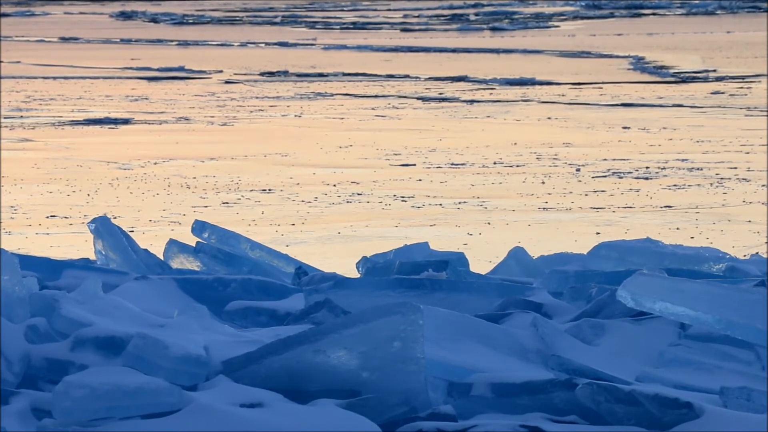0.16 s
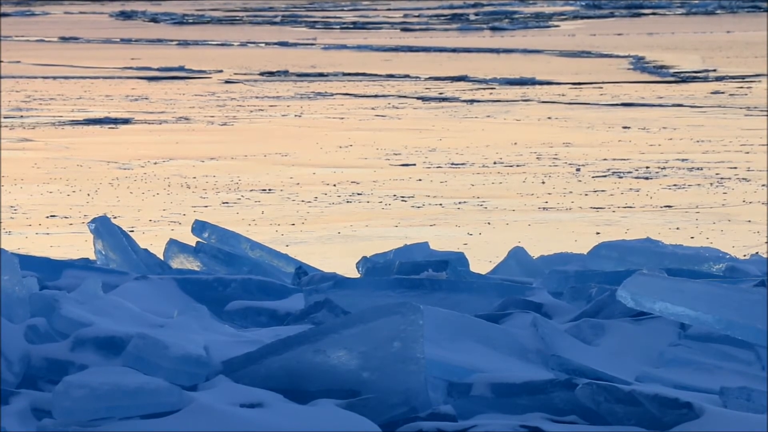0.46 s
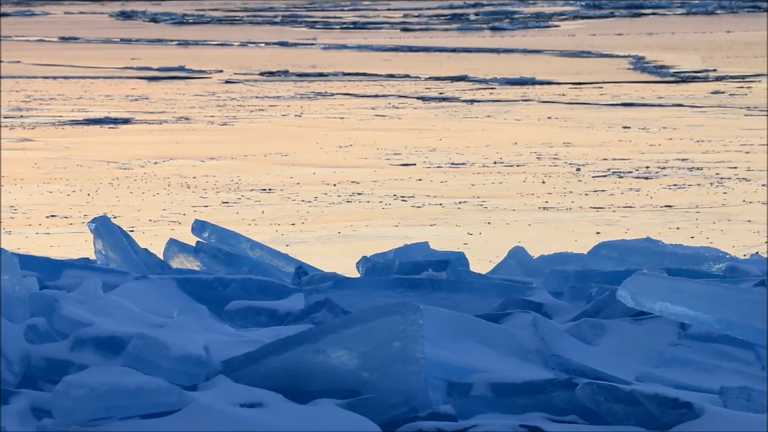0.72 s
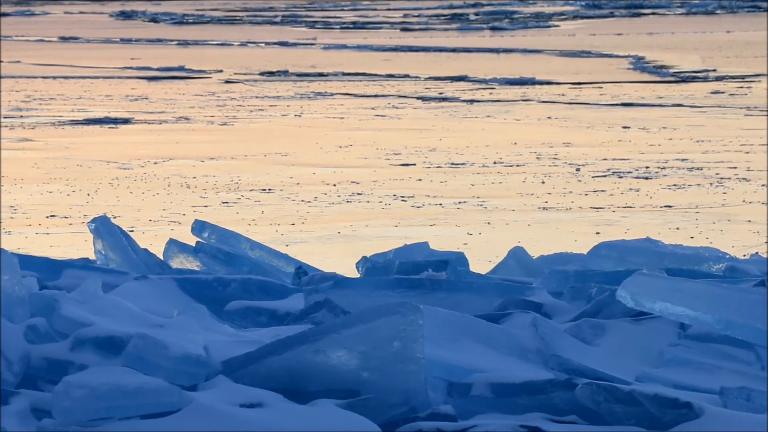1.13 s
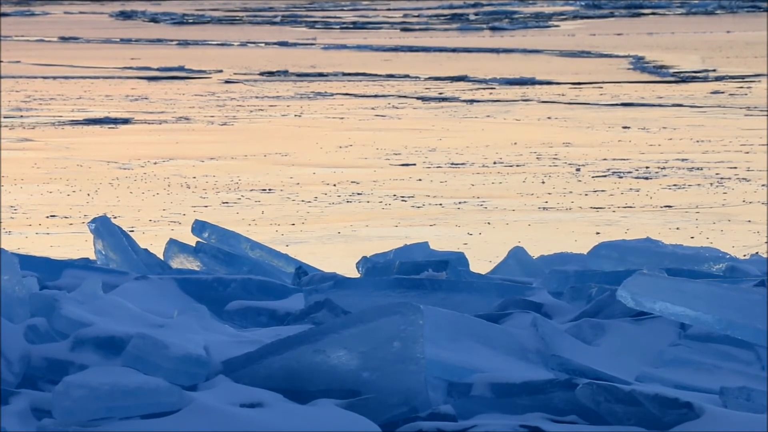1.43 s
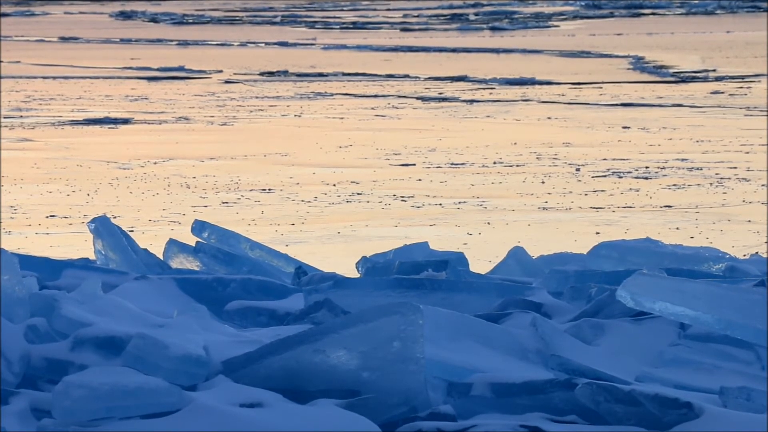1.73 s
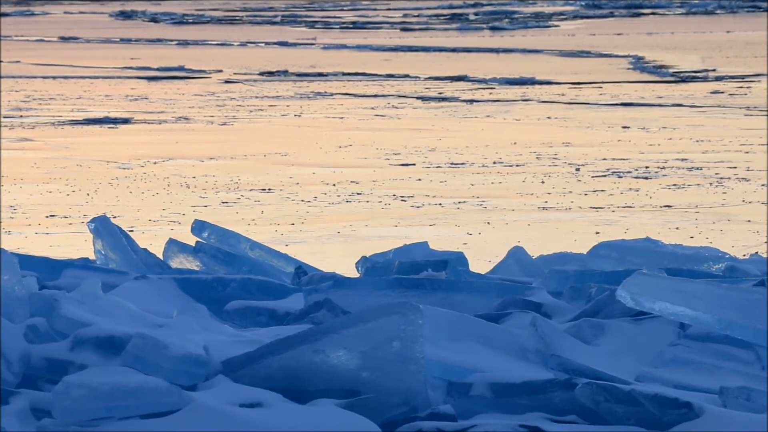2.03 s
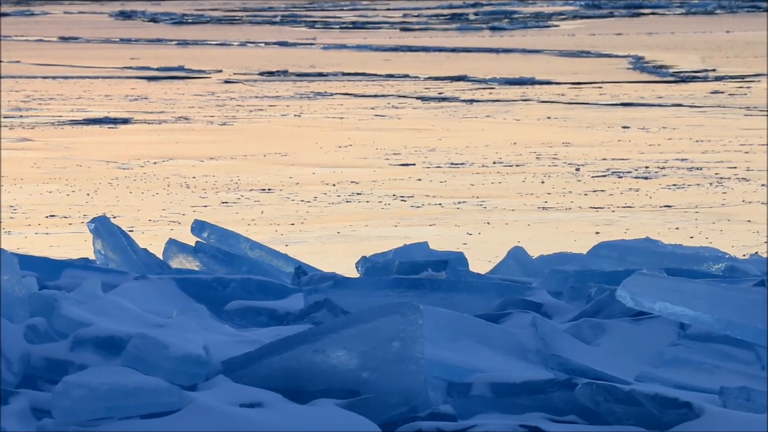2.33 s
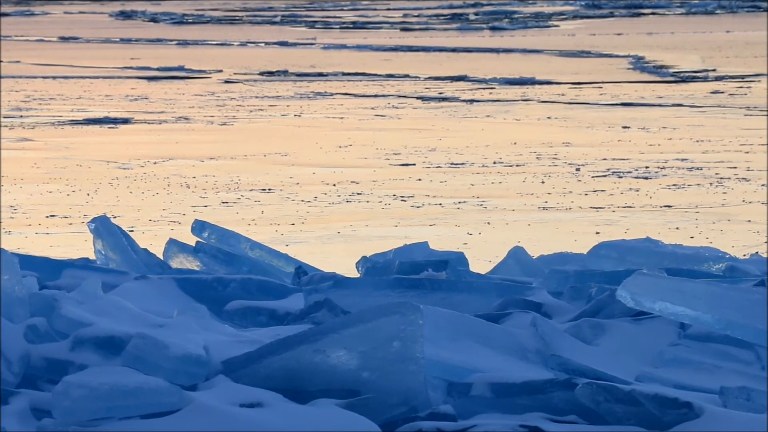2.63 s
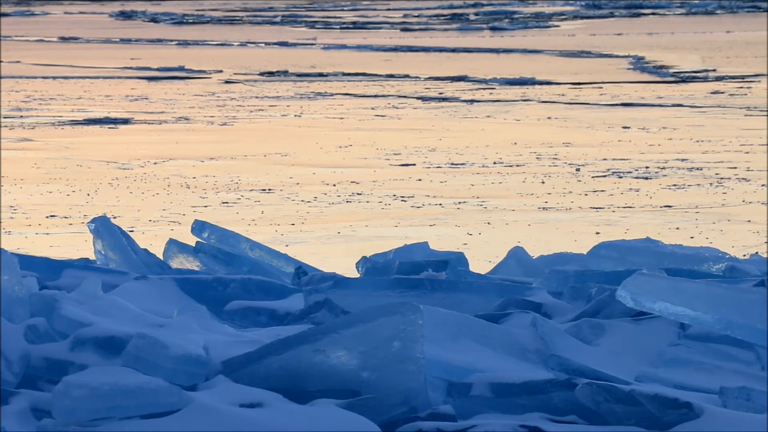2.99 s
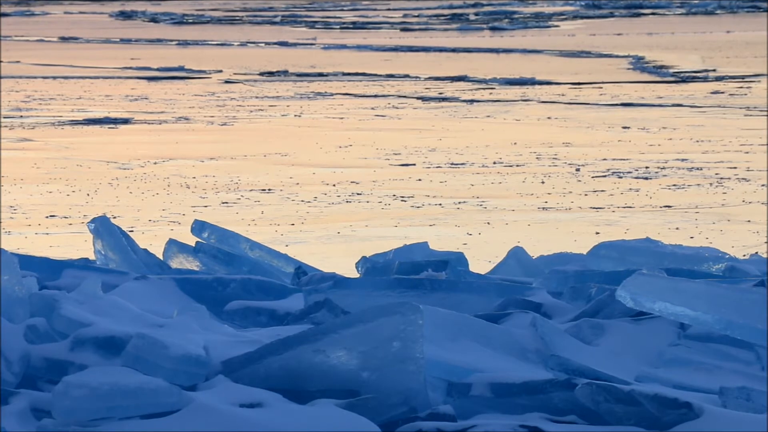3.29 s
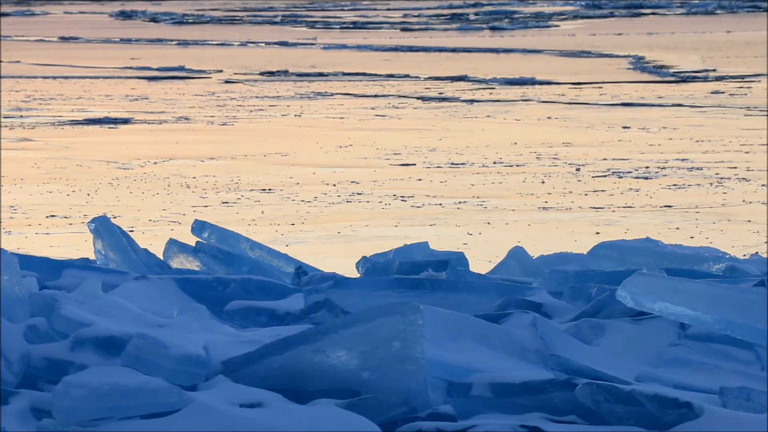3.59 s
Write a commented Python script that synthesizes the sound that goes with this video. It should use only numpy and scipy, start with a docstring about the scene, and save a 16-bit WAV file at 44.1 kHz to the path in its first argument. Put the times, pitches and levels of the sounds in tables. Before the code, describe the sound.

Ice grinds steadily on an open frozen shore: a muffled wash of tiny bumps and a wavering mid-low groan. Hollow knocks and dry ticks crowd the first 1.2 seconds, return around 1.5-1.6, and cluster again at 2.7-2.9 with a faint airy scrape; afterwards the ice calms. Deep wind buffets the microphone throughout, strongest about 1.6-2.3, leaning left, with soft thumps near 0.7 and 3.0 and faint hiss.

```python
"""Grinding ice on a windy, frozen shore

Wind buffets a camera microphone while ice sheets grind and drift offshore.
Shaped noise makes the deep buffeting, the upper rumble, the wash of grinding ice and the recorder's hiss.
The ice groans in a wavering band of noise, with longer fuzzy rings and airy scrapes now and then.
Fading sine tones make the small bumps, soft thumps and hollow knocks; ticks add a snap of noise.
"""
import sys
import numpy as np
from scipy import signal
from scipy.fft import rfft, irfft
from scipy.io import wavfile
from scipy.ndimage import uniform_filter1d

SR = 44100
rng = np.random.default_rng(int(sys.argv[2]) if len(sys.argv) > 2 else 0)


def dump_mix(stems):
    """Bounce the given channels to the path in sys.argv[1] as a 16-bit WAV at rate SR."""
    frames = np.atleast_2d(stems).T  # one column per channel
    limited = np.clip(frames, -1, 1)  # hard clip at full scale
    pcm = np.round(limited * 32767).astype(np.int16)
    wavfile.write(sys.argv[1], SR, pcm)


N = 165375  # length in samples, 3.75 s


def gain_of(db):
    """Turns decibels into a factor for the amplitude."""
    return 10 ** (np.asarray(db) / 20)


def evened(x):
    """Scales a sound to an rms level of 1."""
    return x / np.sqrt(np.mean(x ** 2) + 1e-20)


def read(points, hz):
    """Reads a frequency table at any frequency, along a logarithmic scale."""
    f, value = np.transpose(points)
    return np.interp(np.log(hz + 1), np.log(f + 1), value)


def curve(table, axis):
    """Draws one column of a table as a line over time."""
    rows = np.array(table)
    return np.interp(np.arange(N) / SR, rows[:, 0], rows[:, axis])


def panned(x, db):
    """Makes the left channel louder than the right by db, half up and half down."""
    return x * gain_of(np.array([[db], [-db]]) / 2)


SIDE_LAG_S = 0.00013  # near sounds from the left reach the right port later


def from_left(x, db):
    """Makes a sound louder and earlier at the left port."""
    t = np.arange(len(x)) / SR
    late = np.interp(t - SIDE_LAG_S, t, x)
    return panned(np.array([x, late]), db)


def add(mix, s, sound):
    """Adds a sound to the mix at s seconds, cut off at the end of the mix."""
    part = mix[:, round(s * SR):][:, :sound.shape[1]]
    part += sound[:, :part.shape[1]]


def resonate(x, hz, width):
    """Shifts hz down to zero, smooths, and shifts back: a resonance of gain 1, width in Hz."""
    phase = 2 * np.pi * np.cumsum(hz * np.ones(x.shape[-1])) / SR
    turn = np.exp(1j * phase)
    r = np.exp(-np.pi * width / SR)
    smooth = signal.lfilter([1 - r], [1, -r], x / turn)
    return 2 * (turn * smooth).real


def pair(same, colour):
    """Makes two channels of coloured noise, alike to a degree that depends on frequency."""
    hz = np.fft.rfftfreq(N, 1 / SR)
    a, b = rfft(rng.standard_normal((2, N)))
    c = np.clip(read(same, hz), -1, 1)
    right = c * a + np.sqrt(1 - c ** 2) * b
    return evened(irfft(np.array([a, right]) * gain_of(read(colour, hz)), N))


def wobble(rate):
    """Makes slow random movement of rms 1, mostly below rate times per second."""
    hz = np.fft.rfftfreq(N, 1 / SR)
    z = rfft(rng.standard_normal(N)) / (1 + (hz / rate) ** 4)
    return evened(irfft(z, N))


STEADY = 0.79  # how far random fading is evened out, 0 to 1


def steadied(x, seconds):
    """Evens out random fading using each channel's power plus half the other's, smoothed twice."""
    size = int(seconds * SR)
    power = x ** 2 + x[::-1] ** 2 / 2
    power = uniform_filter1d(uniform_filter1d(power, size), size)
    return evened(x / (power + .02 * power.mean()) ** (STEADY / 2))


# Tone colour of the hiss. Each row: frequency in Hz, relative strength in dB per Hz.
HISS_COLOUR = [(500, 0.5), (3000, -1), (8000, -2), (15500, -3)]
HISS_DB = -57


def hiss():
    """The recorder's own hiss: noise that is unrelated in the two channels."""
    unrelated = [(1, 0), (2, 0)]  # Hz, likeness
    return gain_of(HISS_DB) * pair(unrelated, HISS_COLOUR)


# Gusts of wind. Each row: time in seconds, deep buffeting level in dB, upper rumble level in dB,
# both levels before panning.
GUSTS = [(0.0, -30, -41), (0.04, -41, -57), (0.06, -49, -60), (0.13, -28.5, -43.5), (0.24, -40, -41.5),
         (0.44, -43, -50), (0.48, -28.5, -46), (0.62, -46, -52), (0.69, -31.5, -34), (0.74, -36, -46),
         (0.77, -41.5, -46), (0.89, -32.5, -46.5), (1.07, -42.5, -52), (1.1, -35.5, -47.5),
         (1.32, -38, -45), (1.35, -36.5, -44.5), (1.49, -31.5, -43), (1.53, -32, -43), (1.58, -22, -39.5),
         (1.79, -40.5, -44), (1.83, -23, -42.5), (1.86, -22.5, -39), (2.19, -35, -42), (2.27, -22.5, -50),
         (2.3, -29.5, -37.5), (2.62, -41.5, -48), (2.76, -29.5, -48), (2.83, -41.5, -61),
         (3.06, -29.5, -39.5), (3.18, -45, -63), (3.22, -36, -47), (3.46, -36, -47.5), (3.48, -39, -56.5),
         (3.75, -40, -41)]
# Tone colour of the deep buffeting. Each row: frequency in Hz, relative strength in dB per Hz.
BUFFET_COLOUR = [(5, -56), (8, 7), (21, 7), (33, 5.5), (57, -2), (90, -17.5), (150, -48), (400, -100)]
# Tone colour of the upper rumble. Each row: frequency in Hz, relative strength in dB per Hz.
RUMBLE_COLOUR = [(30, -21), (60, -2.5), (92, -1.5), (140, -8.5), (209, -14), (300, -20), (500, -25.5),
                 (1000, -55), (3000, -100)]
# How alike the wind is left and right. Each row: frequency in Hz, likeness from -1 to 1.
WIND_LIKENESS = [(15, 0.81), (45, 0.68), (70, 0.31), (100, 0.034), (160, -0.37), (270, 0.021)]
WIND_PAN_DB, RUMBLE_PAN_DB = 5.5, 2  # left over right
LUMPS_DB = 3  # rms swing of the rumble's level


def wind():
    """Wind noise: deep buffeting and a lumpier upper rumble, stronger on the left port."""
    deep = steadied(pair(WIND_LIKENESS, BUFFET_COLOUR), 0.047)
    deep = deep * gain_of(curve(GUSTS, axis=1))
    # the left channel swings more slowly than the right
    lumps = gain_of(LUMPS_DB * np.array([wobble(15), wobble(28)]))
    upper = evened(pair(WIND_LIKENESS, RUMBLE_COLOUR) * lumps)
    upper = upper * gain_of(curve(GUSTS, axis=2))
    return panned(deep, WIND_PAN_DB) + panned(upper, RUMBLE_PAN_DB)


# Soft thumps at the microphone. Each row: start in seconds, approximate peak in dB before panning,
# pitch in Hz, left over right in dB.
THUMPS = [(0.672, -32.5, 103, 10), (3.025, -31, 149, 7.5)]
THUMP_T60 = 0.058  # seconds to fade by 60 dB


def thump(peak_db, hz, pan_db):
    """A dull, fading low tone that reaches the two ports partly out of step."""
    t = np.arange(6000) / SR
    lag = np.array([[0], [1.5]])  # radians, left and right
    push = np.sin(2 * np.pi * hz * t - lag) * np.minimum(t / 0.0036, 1)
    # the extra 5 dB offsets fading during the soft start
    return panned(push * gain_of(peak_db + 5 - 60 * t / THUMP_T60), pan_db)


# Strength of the grinding ice, used by wash and bumps. Each row: time in seconds,
# base level in dB before each layer's own offset and panning.
GRIND = [(0.02, -46), (0.36, -50), (0.78, -45), (1.2, -51), (1.6, -48), (2.03, -50), (2.7, -48.5),
         (2.86, -45), (3.16, -49.5), (3.75, -49)]
# Tone colour of the ice noise, for wash and moan. Each row: frequency in Hz, relative strength in dB per Hz.
ICE_COLOUR = [(150, 3), (280, -6), (450, 0), (700, -3), (1050, -8.5), (1540, -12), (2180, -19),
              (4200, -26.5), (9000, -37)]
# How alike the ice noise is left and right, for wash and moan. Each row: frequency in Hz, likeness.
ICE_LIKENESS = [(270, 0.77), (500, 0.92), (1200, 0.67), (2000, 0.43), (4000, 0.41)]
WASH_DB = -0.5  # offset from the base level
WASH_SHARE = 0.94  # how closely the wash follows the changes in level, 0 to 1
GRIND_PAN_DB = 2.5  # left over right, for wash, bumps, moan and rings


def wash():
    """Grinding ice as a broad noise whose level follows the grinding and wobbles at random."""
    level_db = curve(GRIND, axis=1)
    mean_db = level_db.mean()
    wash_db = WASH_DB + mean_db + WASH_SHARE * (level_db - mean_db) + wobble(16)
    return panned(pair(ICE_LIKENESS, ICE_COLOUR) * gain_of(wash_db), GRIND_PAN_DB)


BUMPS_PER_S, BUMPS_DB = 75, -9  # average rate, offset from the base level
BUMP_SPREAD_DB = 3  # scale of the random spread in size


def bumps():
    """Many small random bumps of the ice, each a tone that fades by 60 dB in 25 cycles."""
    spread_db = BUMP_SPREAD_DB * np.minimum(rng.exponential(1, N), 3)
    size = gain_of(spread_db) * (rng.random(N) < BUMPS_PER_S / SR)
    kind = rng.integers(0, 12, N)  # which of twelve pitches
    t = np.arange(3000) / SR
    total = np.zeros(N)
    for k, hz in enumerate(np.geomspace(330, 1000, 12)):
        tone = np.sin(2 * np.pi * hz * t) * gain_of(-60 * t * hz / 25)
        total += signal.oaconvolve(size * (kind == k), tone)[:N]
    return panned(evened(total) * gain_of(curve(GRIND, axis=1) + BUMPS_DB), GRIND_PAN_DB)


# Wavering moan of the ice. Each row: time in seconds, base level in dB before the offset and panning,
# centre in Hz.
MOAN = [(0.02, -39.5, 602), (0.08, -52, 570), (0.12, -49.5, 617), (0.44, -43.5, 618), (0.48, -50, 584),
        (0.58, -39.5, 602), (0.74, -50, 530), (0.76, -46, 510), (0.93, -44.5, 658), (1.08, -46, 563),
        (1.12, -64, 587), (1.16, -41, 652), (1.25, -52.5, 526), (1.45, -49, 556), (1.48, -55, 564),
        (1.56, -40.5, 522), (1.59, -61, 601), (1.62, -48, 652), (1.66, -47, 627), (1.7, -47, 546),
        (1.75, -58, 557), (1.88, -49.5, 571), (2.22, -54, 570), (2.32, -49, 513), (2.35, -54, 521),
        (2.38, -49, 626), (2.45, -52, 550), (2.53, -56, 570), (2.7, -50.5, 577), (2.72, -46, 600),
        (2.76, -48, 610), (2.82, -40.5, 540), (2.87, -57, 507), (2.92, -52, 581), (3.03, -56, 528),
        (3.1, -51, 577), (3.14, -62, 551), (3.22, -54, 535), (3.3, -53, 517), (3.75, -56, 536)]
GROAN_WIDTH_HZ, GROAN_DB = 100, -4  # width of each of two resonances, offset from the base level


def moan():
    """The groan of the ice: noise through two resonances that drift in pitch together."""
    hz = curve(MOAN, axis=2)
    noise = pair(ICE_LIKENESS, ICE_COLOUR)
    for _ in range(2):
        noise = resonate(noise, hz, GROAN_WIDTH_HZ)
    level = gain_of(curve(MOAN, axis=1) + GROAN_DB)
    return panned(steadied(noise, .012) * level, GRIND_PAN_DB)


# Slower, longer rings of the sheet. Each row: start in seconds, length in seconds,
# base level in dB before the offset, swell and panning, centre in Hz.
RINGS = [(1.555, 0.064, -46, 742), (1.63, 0.043, -48.5, 720), (2.36, 0.062, -47, 720),
         (2.89, 0.05, -49, 434), (2.91, 0.06, -46.5, 737), (3.17, 0.11, -48.5, 527)]
RING_WIDTH_HZ = 79  # width of each of two resonances


def ring(length, level_db, hz):
    """A fuzzy note of narrow noise that swells and fades."""
    t = np.arange(0, length, 1 / SR)
    note = rng.standard_normal(len(t) + 2000)
    for _ in range(2):
        note = resonate(note, hz, RING_WIDTH_HZ)
    note = evened(note[2000:])  # skip the resonances' build-up
    swell = np.sin(np.pi * t / length)
    return panned(note * swell * gain_of(level_db - 1.5), GRIND_PAN_DB)


# Scrapes. Each row: start in seconds, length in seconds, level in dB before the soft ends and panning,
# centre in Hz.
SCRAPES = [(.755, 0.071, -55, 1610), (2.29, 0.067, -56, 1510), (2.85, 0.231, -58.5, 1690)]
SCRAPE_WIDTH_HZ, SCRAPE_PAN_DB = 600, 6.5  # width of each of two resonances, left over right


def scrape(length, level_db, hz):
    """Airy rubbing: noise in a narrow band, off to the left, with soft ends."""
    t = np.arange(0, length, 1 / SR)
    rub = rng.standard_normal(len(t))
    for _ in range(2):
        rub = resonate(rub, hz, SCRAPE_WIDTH_HZ)
    rise = t / length / .4  # over the first 40 percent
    fall = (length - t) / .02  # over the last 20 ms
    ends = np.clip(np.minimum(rise, fall), 0, 1)
    return from_left(evened(rub) * ends * gain_of(level_db), SCRAPE_PAN_DB)


# Ticks of cracking ice. Each row: start in seconds, level in dB of the lower ring before fading and panning,
# lower ring in Hz, upper ring in Hz, upper ring in dB against the lower, snap in dB against that level,
# left over right in dB.
TICKS = [(.3072, -41.5, 1440, 2530, -4, -10, 14), (.393, -44, 1730, 2780, 3, -3, 13),
         (.433, -46, 1400, 3670, -2, -13, 11), (.508, -44, 1550, 3000, -1, -18, 14),
         (.5755, -39, 1400, 3070, -1.5, -16, 14.5), (.6614, -42.5, 1500, 3280, -2.5, -15, 15),
         (.8064, -44, 1300, 2800, 2, -15, 11), (.8365, -37.5, 1440, 2730, -6, -18, 16),
         (1.085, -46, 1210, 2500, -15, -22, 10), (1.538, -41, 1410, 2720, -17, -19, 2.5),
         (1.942, -40.5, 1760, 2570, -8, -20, 10), (2.7206, -42, 1660, 3000, -16, -19, 2),
         (2.797, -39, 1550, 2240, -15, -20, 2), (2.979, -44, 1800, 2400, -16, -19, 16),
         (3.3005, -44, 1600, 3300, -5, -18, 8)]
LOWER_T60, UPPER_T60, SNAP_T60 = 0.015, .009, 0.02  # seconds to fade by 60 dB
UPPER_SPLIT = 1.143  # pitch ratio between the three upper tones
TICK_BODY_HZ, TICK_BODY_DB = 824, -1.5  # dB against the lower ring
SNAP_HZ, SNAP_WIDTH_HZ = 6000, 3700


def tick(level_db, lower_hz, upper_hz, upper_db, snap_db, pan_db):
    """Cracking ice: a dull body, a short lower ring, a split upper ring and a bright snap of noise."""
    t = np.arange(1500) / SR
    lower = np.sin(2 * np.pi * lower_hz * t)
    body = gain_of(TICK_BODY_DB) * np.sin(2 * np.pi * TICK_BODY_HZ * t)
    low = (lower + body) * gain_of(-60 * t / LOWER_T60)
    ratios = (1 / UPPER_SPLIT, 1, UPPER_SPLIT)
    upper = sum(np.sin(2 * np.pi * upper_hz * k * t) for k in ratios)
    upper = upper * gain_of(upper_db - 60 * t / UPPER_T60)
    snap = evened(resonate(rng.standard_normal(len(t)), SNAP_HZ, SNAP_WIDTH_HZ))
    snap = snap * gain_of(snap_db - 60 * t / SNAP_T60)
    start = np.minimum(t / 0.00044, 1)
    return from_left((low + upper + snap) * start * gain_of(level_db), pan_db)


# Knocks of floes. Each row: start in seconds, peak in dB before panning, pitch in Hz, left over right in dB,
# seconds for the main note to fade by 60 dB, extra level of the overtones in dB.
KNOCKS = [(0.077, -31.5, 373, 2.5, 0.042, 1), (0.221, -41, 506, 3.5, 0.075, -17),
          (0.66, -35.5, 573, 16, 0.043, -13), (0.774, -37, 526, 11, 0.051, -6),
          (0.855, -40, 614, 1, 0.06, -16), (0.914, -31, 653, 3.5, 0.044, -6.5),
          (0.993, -38.5, 650, 6, 0.07, -11), (1.158, -36.5, 620, 4.0, 0.09, -20),
          (1.538, -33, 604, 2.0, 0.041, 4), (1.558, -31, 436, 5, 0.04, 2.5),
          (1.614, -26.5, 653, 3.0, 0.049, -6.5), (1.939, -35.5, 400, -1, 0.045, 0.5),
          (2.305, -37, 410, 6.0, 0.073, -1), (2.688, -40.5, 587, 4.0, 0.053, -1),
          (2.72, -27, 564, 4.5, 0.042, 1), (2.791, -35, 601, 6, 0.1, 6), (2.824, -41, 493, 5, 0.06, -5),
          (2.899, -37.5, 441, 6, 0.097, -8)]
# Overtones of a knock. Each row: ratio to the pitch, level in dB before that extra level,
# share of the main note's fading time.
KNOCK_OVERTONES = [(1.32, -4.5, 1), (1.7, -3, 0.66), (2.3, -13.5, 0.36)]


def knock(peak_db, hz, pan_db, t60, over_db):
    """Knocking floes: a hollow fading note, with a few overtones that fade at least as fast."""
    t = np.arange(8000) / SR
    note = gain_of(-60 * t / t60) * np.sin(2 * np.pi * hz * t)
    for ratio, db, share in KNOCK_OVERTONES:
        fade = gain_of(over_db + db - 60 * t / (share * t60))
        note += fade * np.sin(2 * np.pi * hz * ratio * t)
    note = note * np.minimum(t / .002, 1)  # 2 ms soft start
    return panned(note / abs(note).max() * gain_of(peak_db), pan_db)


def scene():
    """Layers the wind and the grinding ice, then places every single sound at its time."""
    mix = wind() + wash() + bumps() + moan()
    events = ((THUMPS, thump), (RINGS, ring), (SCRAPES, scrape), (TICKS, tick), (KNOCKS, knock))
    for table, source in events:
        for start, *settings in table:
            add(mix, start, source(*settings))
    return mix


EDGE_HZ = 15780  # upper band limit


def record(dry):
    """Adds the recorder's hiss, then removes the treble above the band limit."""
    low_pass = signal.firwin(1023, EDGE_HZ, window=("kaiser", 9), fs=SR)
    return signal.oaconvolve(dry + hiss(), low_pass[None], "same")


dry = scene()
out = record(dry)
dump_mix(out)
```